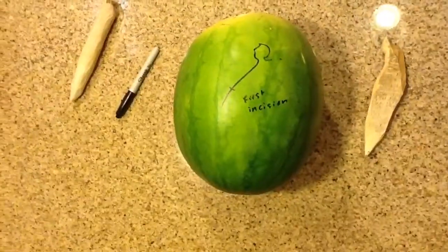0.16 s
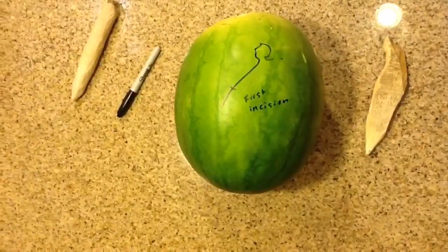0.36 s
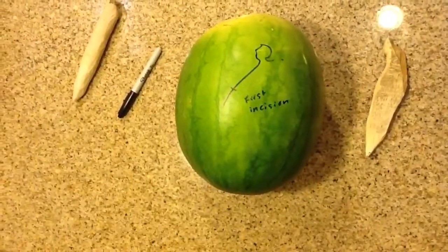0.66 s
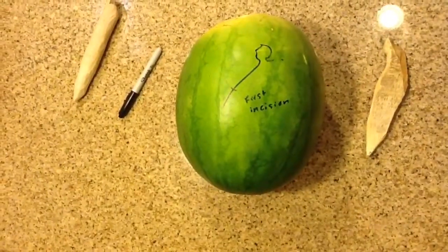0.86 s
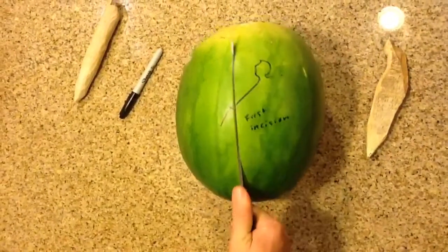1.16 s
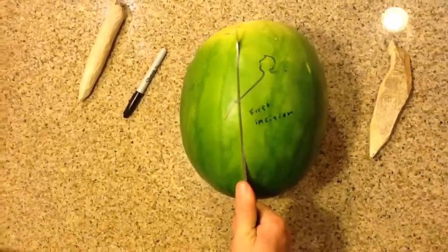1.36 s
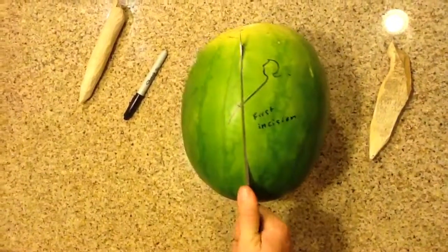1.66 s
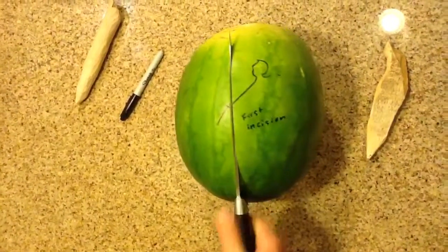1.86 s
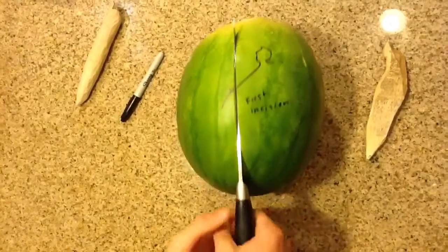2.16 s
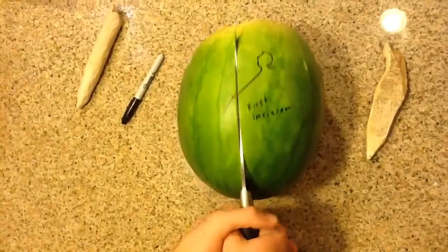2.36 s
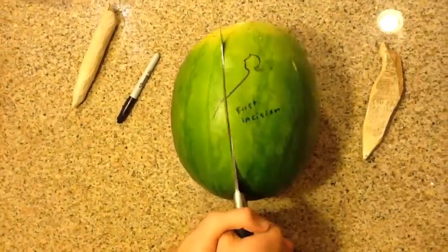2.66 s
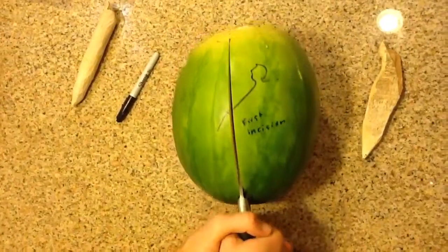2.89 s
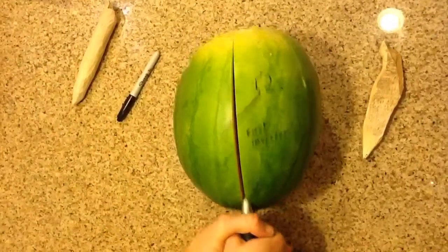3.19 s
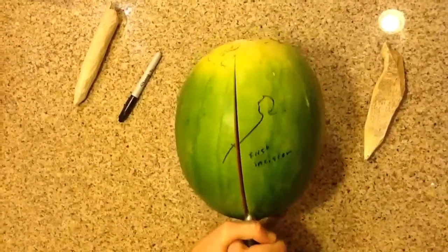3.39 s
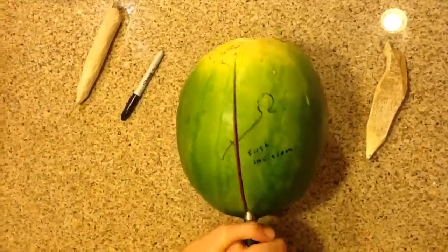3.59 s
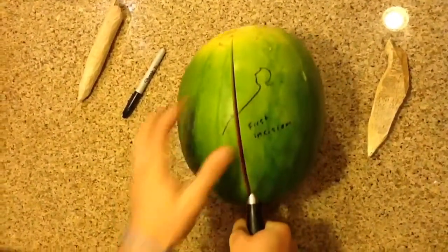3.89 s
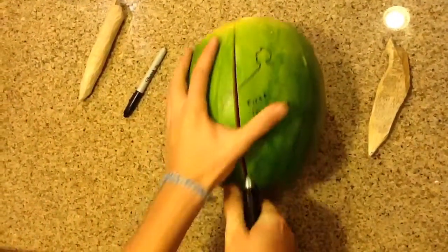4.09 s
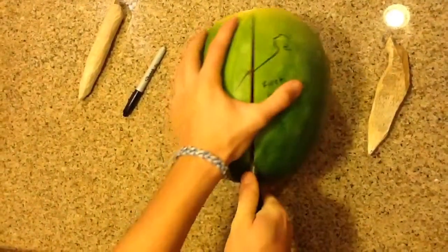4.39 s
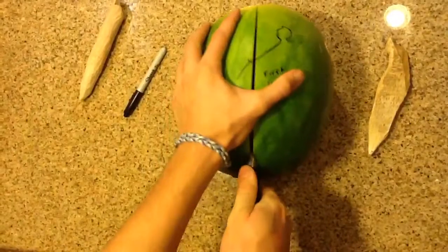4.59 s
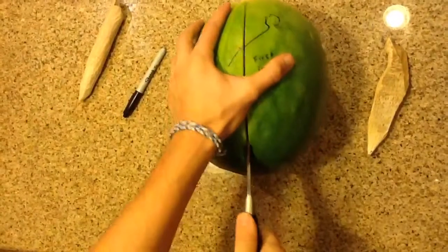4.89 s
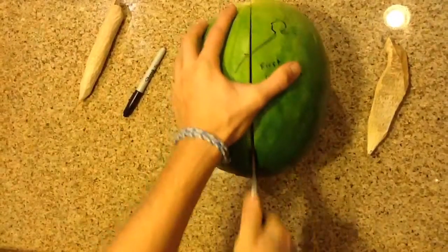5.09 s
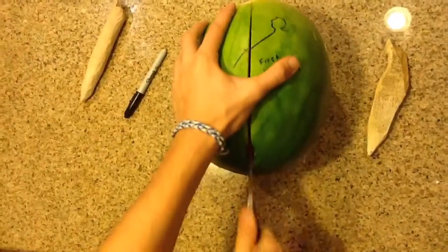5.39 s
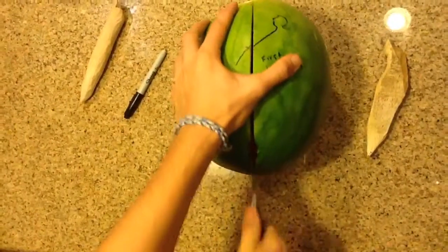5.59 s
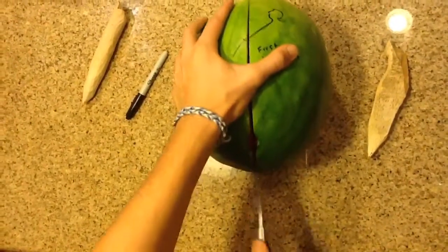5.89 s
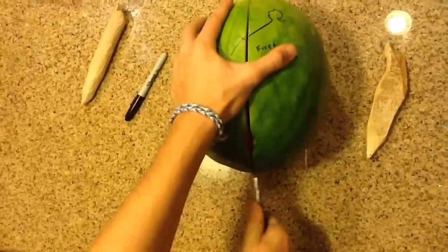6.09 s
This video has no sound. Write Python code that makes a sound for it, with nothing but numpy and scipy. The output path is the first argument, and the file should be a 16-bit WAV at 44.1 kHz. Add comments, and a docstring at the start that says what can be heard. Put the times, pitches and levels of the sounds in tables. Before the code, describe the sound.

Over faint ventilation, one sharp cracking chop rings a watermelon, a quiet press follows, then a crackling split, a rocking thump and juicy cuts.

```python
"""A low steady drone of ventilation (coloured noise) and two sleeve swishes come first, as a knife is raised.
The big knife then whacks into a whole watermelon on a stone kitchen counter and sticks: blows ring the melon.
It is pressed down until the rind tears and the melon rocks, then sawn on in short wet strokes.
Cutting is made of many tiny random bursts, and snaps are short damped rings.
The hard room answers with scattered echoes, a fading tail and a few standing waves."""
import sys
import numpy as np
from scipy import signal
from scipy.fft import rfft, irfft, next_fast_len
from scipy.io import wavfile

SR = 44100
rng = np.random.default_rng(int(sys.argv[2]) if len(sys.argv) > 2 else 0)


def to_wav(sig):
    """Store sig (one row per channel, or 1-D mono) as 16-bit WAV at the path in sys.argv[1].

    Samples outside -1..1 are clipped; the rate is SR.
    """
    pcm = np.clip(np.atleast_2d(sig), -1, 1) * 32767
    pcm = np.round(pcm).astype(np.int16)
    wavfile.write(sys.argv[1], SR, pcm.T)  # frames by channels


N = 275625
TIME = np.arange(N) / SR

# In all tables, t60_s is the time a ring or echo takes to fall by 60 dB.

# colour of the ventilation drone: pitch_hz, level_db (per Hz, shape only)
AIR_COLOUR = [(25, -53.5), (53, -49.5), (78, -20), (122, -14.5), (170, 0), (260, -0.5), (340, -3),
              (480, -11.5), (820, -14), (1100, -19), (2000, -23.5), (3600, -27), (10000, -27.5),
              (15500, -30)]
AIR_DB = -54.5
# thin whines of the fan: pitch_hz, level_db
FAN_WHINES = [(2972, -79.5), (3268, -80.5)]

# a sleeve swishes twice as the knife is raised: centre_s, length_s, level_db
SLEEVE_SWISHES = [(0.272, 0.52, -65.5), (0.773, .5, -64.5)]
# colour of cloth on cloth: pitch_hz, level_db (per Hz, shape only)
CLOTH_COLOUR = [(100, -16), (300, 7.5), (700, 3), (1500, 3), (3000, -0.5), (6500, -2.5), (10000, -6),
                (16000, -13)]

# the louder snaps of rind and fibres, and the clacks of the blade as it frees itself (around 4.77-4.78 s):
# start_s, ring_db, pitch_hz, t60_s
LOUD_SNAPS = [(.977, -40, 1000, .006), (1.318, -39, 6500, .0022), (1.741, -40, 2204, 0.0046),
              (3.1706, -20.5, 1905, 0.0033), (3.172, -24.5, 4550, 0.013), (3.179, -20, 2300, .005),
              (3.2006, -21, 1560, 0.015), (3.223, -19.5, 3000, .002), (3.290, -27, 2170, .012),
              (3.417, -33.5, 9000, .0015), (3.602, -41, 7000, 0.0022), (4.432, -29.5, 1384, 0.00096),
              (4.652, -28.5, 1400, 0.003), (4.7525, -21, 9500, .005), (4.7654, -25.5, 2000, .022),
              (4.783, -15, 2890, 0.0094), (4.7834, -17, 2190, 0.0083), (5.128, -21.5, 4870, 0.0022),
              (5.391, -26.5, 14200, 0.0026), (5.495, -33, 1200, .005), (5.5343, -27, 6800, 0.0032),
              (5.5413, -28, 9350, 0.0037), (5.7135, -38, 2400, 0.0035), (5.7715, -22.5, 6350, 0.0024)]
# a snap that rings for EDGE_T60_S has an edge of EDGE_DB (relative to its ring); longer rings start more softly
EDGE_T60_S, EDGE_DB, EDGE_DB_PER_DOUBLING = 0.0027, -3.5, -6

# the rind ruptures, at the chop and when it tears; the spray dies before the crunch does:
# start_s, rise_s, hiss_db, hiss_fall_s, crunch_db, crunch_hold_s, crunch_fall_s
RIND_RUPTURES = [(1.074, .001, -27.5, 0.029, -28.5, .003, .029),
                 (3.162, 0.0086, -38, .11, -38.5, 0.048, .15)]
# coarse rind fibres crackle all along a rupture; the level is relative to the crunch
CRACKLES_PER_S, CRACKLE_DB = 160, -5
# slow leans on the knife, in which the blade creeps through the flesh:
# start_s, length_s, rise_share (part of the length spent rising), crunch_db, hiss_db
SLOW_LEANS = [(1.847, 1.63, 0.42, -64, -70), (3.2, 1.1, 0.088, -74, -72), (4.277, 0.66, 0.37, -65.5, -59.5),
              (4.632, 0.3, 0.26, -53.5, -58), (5.027, 2, 0.092, -63.5, -66)]
# quick pushes of the blade: start_s, length_s, rise_share, crunch_db, hiss_db, squeak_hz, squeak_db
QUICK_STROKES = [(2.791, 0.065, 0.25, -48.5, -46.5, 4680, -47), (4.721, 0.072, 0.4, -48, -41.5, 9500, -52),
                 (5.059, 0.12, 0.33, -60, -52.5, 2980, -52.5), (5.318, 0.079, .15, -56.5, -48, 3320, -50.5),
                 (5.344, 0.1, 0.28, -51, -61, 1730, -50.5), (5.53, 0.094, 0.2, -51.5, -48.5, 5900, -66),
                 (5.726, 0.1, 0.36, -53.5, -49.5, 5750, -58), (5.958, 0.11, 0.44, -53.5, -50, 2750, -64)]
FALL_SHARE = 0.65  # part of the time after the rise that is spent letting go
# small fibres give way at random during the strokes: rate at full push, and level
FIBRES_PER_S, FIBRE_DB = 45, -39.5
# colours of crushed rind and of wet flesh: pitch_hz, level_db (per Hz, shape only)
CRUNCH_COLOUR = [(100, -38), (200, -7.5), (330, 0), (600, -2.5), (1000, 0), (1600, -0.5), (2500, -2),
                 (3500, -8.5), (6000, -20.5), (16000, -40)]
HISS_COLOUR = [(300, -34), (1500, -15), (3000, -4.5), (4800, 0), (7000, 0), (10000, 1), (12500, -5.5),
               (16000, -4.5)]

# the blade bites through the skin in two quick cracks, then slaps as it stops: # start_s, ring_db, pitch_hz,
# t60_s, edge_db (relative to the ring)
BITE_SNAPS = [(1.075, 7, 2124, 0.0016, -2), (1.0756, -12, 10050, .0025, 8),
              (1.0782, -7.5, 700, .0068, -14.5)]
# blows of the blade on the melon: start_s, strength_db, softness_hz (cut-off: lower is softer)
BLADE_BLOWS = [(1.0751, 1.5, 9000), (3.2003, -28, 3000), (3.2892, -22, 1500), (4.769, -22.5, 900),
               (4.7835, -27.5, 2500)]
# rings of the melon with the blade in it: pitch_hz, level_db (relative to the blow), t60_s
MELON_RINGS = [(172, -30.5, 0.16), (325, -19, 0.12), (423, -20, 0.046), (582, -16.5, 0.058),
               (819, -26.5, 0.069), (1021, -15.5, .045), (1213, -16.5, 0.062), (1550, -22, 0.033),
               (1590, -18, 0.041), (1770, -22, 0.025), (2045, -21.5, 0.043), (2280, -27.5, 0.024),
               (2800, -26.5, 0.027), (2986, -25, .04), (3410, -30.5, 0.025), (4460, -32, .02)]
# the counter thuds under every blow; the level is relative to the blow
THUD_HZ, THUD_DB, THUD_T60_S = 126, -37, 0.12

# the wet cut sings faintly against the sliding steel: centre_s, length_s, pitch_hz, level_db
SLIT_WHISPERS = [(2.16, 0.59, 780, -67), (3.28, 0.14, 846, -49.5), (4.62, 0.26, 10300, -62.5),
                 (4.657, 0.24, 7320, -60.5), (5.42, 0.47, 1300, -63.5), (6.15, .25, 1260, -64)]

# under steady pressure the steel squeals thinly, an octave pair that sags in pitch
SQUEAL_S, SQUEAL_LENGTH_S = 2.45, 0.36
SQUEAL_HZ, SQUEAL_SAG_HZ_PER_S, SQUEAL_WIDTH_HZ = 2230, 350, 70
SQUEAL_DB, SQUEAL_OCTAVE_DB = -69.5, -71.5

# the split melon rocks on the counter: start_s, strength_db, softness_hz (cut-off)
MELON_ROCKS = [(3.2055, -5, 1200), (3.2135, -9, 1200), (3.2498, 2, 526), (4.652, -22.5, 900),
               (4.7905, -14, 900), (6.14, -18, 500)]
# rings of the opened halves on the stone: pitch_hz, level_db (relative to the rock), t60_s
HALF_RINGS = [(174, -46, 0.11), (303, -30.5, 0.077), (356, -28.5, 0.061), (451, -30, 0.073),
              (622, -31, 0.047), (893, -35, 0.087), (1250, -32, 0.04)]
# each rock ends in a wobble of lighter touches: spacing, first level relative to the rock, loss per touch
WOBBLE_S, WOBBLE_DB, WOBBLE_LOSS_DB = 0.0185, -10.5, 1

# echoes of the kitchen: pitch_hz, echo_level_db, t60_s
KITCHEN_ECHOES = [(100, -4.5, 0.43), (170, -5.5, 0.62), (320, -5.5, .4), (600, -5.5, .5), (900, -3.5, .53),
                  (1381, -4.5, 0.56), (2500, -9.5, 0.5), (4493, -5, 0.49), (8000, -9.5, 0.41),
                  (15000, -12, .22)]
# standing waves between counter and cupboards: pitch_hz, gain_db, t60_s
STANDING_WAVES = [(309.8, 3, 0.56), (354.5, 2.5, 0.31), (399, -0.5, 0.42), (592, -11, .3), (673, -3.5, .4),
                  (1230, -4, 0.37), (1650, -4, 0.28)]
CUTOFF_HZ = 15300  # nearly nothing is left above this


def from_db(db):
    """Turn decibels into a plain factor."""
    return 10 ** (np.asarray(db) / 20)


def rms_one(x):
    """Scale a sound to an average (rms) level of 1."""
    return x / np.sqrt(np.mean(x ** 2) + 1e-20)


def at_hz(points, hz, axis=1):
    """Read one column of a table between its pitches, on a log-frequency scale."""
    points = np.array(points)
    return np.interp(np.log(np.maximum(hz, 1)), np.log(points[:, 0]), points[:, axis])


def coloured(x, spectrum):
    """Give a steady texture the wanted balance of low and high; rms 1."""
    size = next_fast_len(N)
    gain = from_db(at_hz(spectrum, np.fft.rfftfreq(size, 1 / SR)))
    return rms_one(irfft(rfft(x, size) * gain, size)[:N])


def butter(x, hz, kind, order=2):
    """Keep the lows ("low") or the highs ("high") of a sound."""
    return signal.sosfilt(signal.butter(order, hz, kind, fs=SR, output="sos"), x)


def ring(x, hz, t60):
    """A damped resonance: a unit click starts a dying sine of height 1."""
    decay = from_db(-60 / (t60 * SR))  # per sample
    turn = 2 * np.pi * hz / SR
    # the tiny offset keeps the filter away from extremely small, slow numbers
    return signal.lfilter([0, np.sin(turn)], [1, -2 * decay * np.cos(turn), decay ** 2], x + 1e-18)


def add(track, s, sound):
    """Mix a short sound in at a time."""
    at = round(s * SR)
    track[at:at + len(sound)] += sound[:N - at]


def click(size=8192):
    """A single unit pulse followed by near silence."""
    return signal.unit_impulse(size) + 1e-18


def bursts(per_s, spread_db):
    """Random bursts: many tiny clicks and a few larger ones."""
    sizes = from_db(spread_db * np.minimum(rng.exponential(1, N), 4))
    signs = rng.choice([-1, 1], N)
    return sizes * signs * (rng.random(N) < per_s / SR)


def envelope(start, rise, hold, fall):
    """Attack, hold and release, with slightly hollow flanks."""
    return np.interp(TIME - start, np.cumsum([0, rise, hold, fall]), [0, 1, 1, 0]) ** 1.17


def push(start, length, rise_share):
    """The hand builds up force, holds it and lets go."""
    rise = length * rise_share
    fall = (length - rise) * FALL_SHARE
    return envelope(start, rise, length - rise - fall, fall)


def swell(centre, length):
    """A smooth rise and fall."""
    return np.cos(np.pi * np.clip((TIME - centre) / length, -0.5, 0.5))


def flicker(depth_db, rate_hz):
    """An uneven gain from slow noise, as from a grip that catches and slips."""
    return from_db(depth_db * rms_one(butter(rng.standard_normal(N), rate_hz, "low")))


def ventilation():
    """Coloured noise makes a low airy drone; noise-fed resonances make two faint, slightly wavering whines."""
    out = from_db(AIR_DB) * coloured(rng.standard_normal(N), AIR_COLOUR)
    for hz, level_db in FAN_WHINES:
        out += from_db(level_db) * rms_one(ring(rng.standard_normal(N), hz, t60=0.3))
    return out


def sleeve():
    """Cloth slides softly over cloth: dense tiny bursts swell and fade."""
    motion = sum(from_db(level_db) * swell(s, length) for s, length, level_db in SLEEVE_SWISHES)
    return motion * coloured(bursts(per_s=12000, spread_db=2.0), CLOTH_COLOUR)


def snap(ring_db, hz, t60, edge_db, edge_hz=3500, low_hz=170):
    """A short snap: a sharp edge and a few damped cycles."""
    edge = from_db(edge_db) * butter(click(), edge_hz, "high", order=1)
    cycles = butter(ring(click(), hz, t60), hz / 4, "high", order=1)
    return from_db(ring_db) * butter(cycles + edge, low_hz, "high", order=1)


def snaps():
    """Single fibres break inside the cut, and the blade clacks as it frees itself; the shorter the ring, the
    sharper the edge."""
    out = np.zeros(N)
    for s, ring_db, hz, t60 in LOUD_SNAPS:
        doublings = np.log2(t60 / EDGE_T60_S)
        add(out, s, snap(ring_db, hz, t60, EDGE_DB + EDGE_DB_PER_DOUBLING * doublings))
    return out


def cutting(squeak_t60=0.0049, judder_db=1.23, judder_hz=140, fibre_hz=5500, fibre_t60=0.0016):
    """The moving blade crushes coarse rind cells and fine juicy ones; the cut squeaks against its sides."""
    crunch, hiss, squeaks, effort, tearing = np.zeros((5, N))
    friction = bursts(per_s=5000, spread_db=2.5)

    # first find how strong each part is at every moment
    for start, length, rise_share, crunch_db, hiss_db in SLOW_LEANS:
        force = push(start, length, rise_share)
        crunch += from_db(crunch_db) * force
        hiss += from_db(hiss_db) * force
    for start, length, rise_share, crunch_db, hiss_db, squeak_hz, squeak_db in QUICK_STROKES:
        force = push(start, length, rise_share)
        effort += force
        crunch += from_db(crunch_db) * force
        hiss += from_db(hiss_db) * force
        squeaks += from_db(squeak_db) * force * rms_one(ring(friction, squeak_hz, squeak_t60))
    for start, rise, hiss_db, hiss_fall, crunch_db, hold, fall in RIND_RUPTURES:
        tearing += from_db(crunch_db) * envelope(start, rise, hold, fall)
        hiss += from_db(hiss_db) * envelope(start, rise, 0, hiss_fall)

    # then make the textures that these strengths shape
    rind = coloured(bursts(per_s=2500, spread_db=3.0), CRUNCH_COLOUR)
    juice = coloured(bursts(per_s=9000, spread_db=4.5), HISS_COLOUR)
    coarse = ring(bursts(per_s=CRACKLES_PER_S, spread_db=1.5), hz=1900, t60=0.0018)
    crackle = from_db(CRACKLE_DB) * rms_one(butter(coarse, hz=500, kind="high"))
    breaks = effort * bursts(per_s=FIBRES_PER_S, spread_db=3.0)
    fibres = from_db(FIBRE_DB) * ring(breaks, fibre_hz, fibre_t60)

    crushed = (crunch + tearing) * rind + tearing * crackle + hiss * juice
    bright = butter(squeaks + fibres, hz=600, kind="high")
    # the blade catches and slips, so every push is uneven
    return flicker(judder_db, judder_hz) * (crushed + bright)


def bite():
    """The skin cracks twice under the swung blade, then the blade slaps as it stops; each a sharp edge with a
    short ring."""
    out = np.zeros(N)
    for s, ring_db, hz, t60, edge_db in BITE_SNAPS:
        add(out, s, snap(ring_db, hz, t60, edge_db))
    return out


def knocks(blows, modes, low_hz):
    """Each blow rings the melon's modes (its own pitches); a soft contact reaches only the low ones."""
    force = np.zeros(N)
    for s, level_db, soft_hz in blows:
        add(force, s, from_db(level_db) * butter(click(), soft_hz, "low"))
    body = np.zeros(N)
    for k, (hz, db, t60) in enumerate(modes):
        sign = (-1) ** k  # neighbouring modes start in opposite directions
        body += sign * from_db(db) * ring(force, hz, t60)
    return butter(body, low_hz, "high", order=3)


def thud(low_hz=105):
    """The melon passes each blow on to the counter, which rings low and briefly."""
    out = np.zeros(N)
    for s, level_db, _ in BLADE_BLOWS:
        add(out, s, from_db(level_db + THUD_DB) * ring(click(), THUD_HZ, THUD_T60_S))
    return butter(out, low_hz, "high", order=3)


def whispers(ring_cycles=30):
    """Light friction in the narrow slit swells and fades around one pitch."""
    friction = bursts(per_s=4000, spread_db=4.0)
    out = np.zeros(N)
    for s, length, hz, level_db in SLIT_WHISPERS:
        tone = rms_one(ring(friction, hz, t60=ring_cycles / hz))
        out += from_db(level_db) * swell(s, length) * tone
    return flicker(depth_db=3, rate_hz=22) * out


def gliding(hz, width_hz):
    """Friction ringing at a moving pitch: slow noise carried on a sine and a cosine; rms 1."""
    real, imaginary = butter(rng.standard_normal((2, N)), width_hz / 2, "low")
    phase = 2 * np.pi * np.cumsum(hz) / SR
    return rms_one(real * np.cos(phase) + imaginary * np.sin(phase))


def squeal(rise_share=0.078):
    """Wet rind grips the slowly sinking blade, giving two narrow noisy tones an octave apart."""
    hz = SQUEAL_HZ - SQUEAL_SAG_HZ_PER_S * np.clip(TIME - SQUEAL_S, 0, SQUEAL_LENGTH_S)
    lower = from_db(SQUEAL_DB) * gliding(hz, SQUEAL_WIDTH_HZ)
    upper = from_db(SQUEAL_OCTAVE_DB) * gliding(2 * hz, 2 * SQUEAL_WIDTH_HZ)
    force = push(SQUEAL_S, SQUEAL_LENGTH_S, rise_share)
    return force * flicker(depth_db=4, rate_hz=18) * (lower + upper)


def wobbling(rocks, count=4):
    """Every rock, followed by its dying run of touches."""
    touches = list(rocks)
    for s, level_db, soft_hz in rocks:
        for k in range(count):
            touch_s = s + WOBBLE_S * (k + 1 + rng.uniform(-0.098, 0.1))
            touches.append((touch_s, level_db + WOBBLE_DB - WOBBLE_LOSS_DB * k, soft_hz))
    return touches


def near_echoes(x, level_db=-11, t60=0.036, top_hz=9000, size=2048):
    """The counter and the things on it scatter sound back within milliseconds."""
    t = TIME[:size]
    scatter = rng.standard_normal(size) * (t > 0.001) * from_db(-60 * t / t60)
    scatter = butter(scatter, top_hz, "low", order=1)
    scatter = rms_one(butter(scatter, hz=1130, kind="high")) / np.sqrt(size)  # total energy 1
    return from_db(level_db) * signal.fftconvolve(x, scatter)[:N]


def kitchen(x, build_s=0.009):
    """Dense wall echoes build up within milliseconds and die away, the highest treble fastest."""
    t = TIME[:SR]  # one second of echo
    white = rfft(rng.standard_normal(SR))
    hz = np.fft.rfftfreq(SR, 1 / SR)
    edges = 88 * 2 ** (np.arange(31) / 4)  # bands a quarter of an octave wide, in Hz
    build_up = 1 - np.exp(-(t / build_s) ** 2)
    echo = np.zeros(SR)
    for low, high in zip(edges, edges[1:]):
        centre = np.sqrt(low * high)
        fading = from_db(-60 * t / at_hz(KITCHEN_ECHOES, centre, axis=2))
        band = irfft(white * (hz >= low) * (hz < high), SR) * fading * build_up
        # wider bands hold a larger share of the energy
        share = np.sqrt(2 * (high - low)) / SR
        echo += from_db(at_hz(KITCHEN_ECHOES, centre)) * rms_one(band) * share
    return signal.fftconvolve(x, echo)[:N]


def standing_waves(x):
    """A few pitches build up in the room and outlast the blow."""
    out = np.zeros(N)
    for hz, gain_db, t60 in STANDING_WAVES:
        unit_gain = 2 * np.log(1000) / (t60 * SR)  # a steady tone at this pitch keeps its level
        out += from_db(gain_db) * unit_gain * ring(x, hz, t60)
    return out


def scene(knock_room_db=-3.0, rock_room_db=-4.5, blade_room_db=-1.0, bite_room_db=2.0, snap_room_db=-4.0):
    """Melon and blade are heard directly and through the room; the slit beams its snaps up, so they echo less."""
    blade = sleeve() + cutting() + whispers() + squeal()
    struck = knocks(BLADE_BLOWS, MELON_RINGS, low_hz=133.0) + thud()
    rocking = knocks(wobbling(MELON_ROCKS), HALF_RINGS, low_hz=169)
    # each sound with the level it sends into the room
    sources = [(blade, blade_room_db), (snaps(), snap_room_db), (bite(), bite_room_db),
               (struck, knock_room_db), (rocking, rock_room_db)]
    direct = sum(sound for sound, _ in sources)
    spread = sum(from_db(room_db) * sound for sound, room_db in sources)
    room = near_echoes(spread) + kitchen(spread) + standing_waves(spread)
    return (direct + room + ventilation())[None]


def record(dry, limit_db=0.0, recover_db_per_s=1.0):
    """A limiter ducks at peaks over the limit and recovers slowly; then the top of the treble is cut."""
    over_db = np.maximum(20 * np.log10(np.abs(dry) + 1e-9) - limit_db, 0)
    recovery_db = recover_db_per_s * TIME
    held_db = np.maximum.accumulate(over_db + recovery_db, axis=-1) - recovery_db
    steep = signal.ellip(14, 0.1, 90, CUTOFF_HZ, fs=SR, output="sos")
    return signal.sosfilt(steep, dry * from_db(-held_db))


dry = scene()
out = record(dry)
to_wav(out)
```